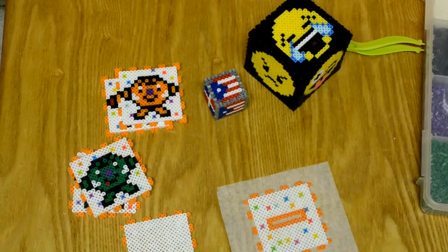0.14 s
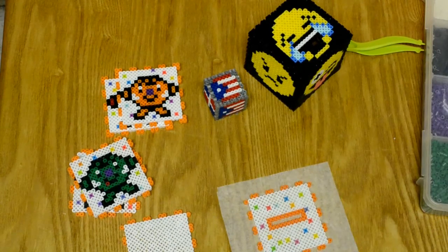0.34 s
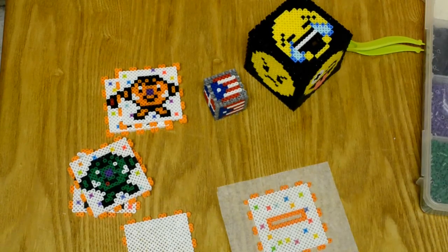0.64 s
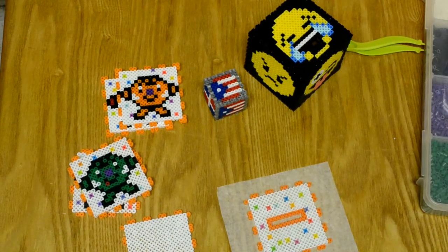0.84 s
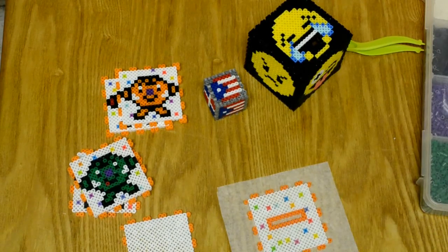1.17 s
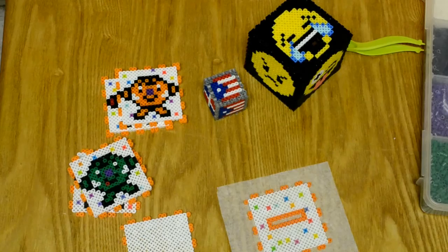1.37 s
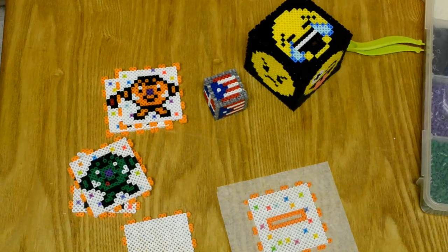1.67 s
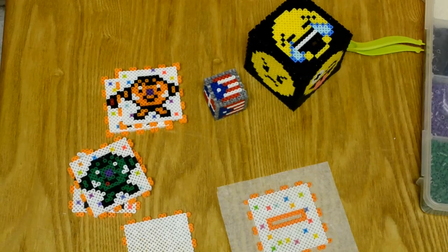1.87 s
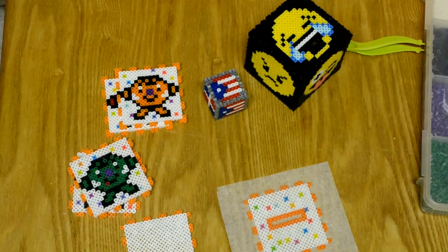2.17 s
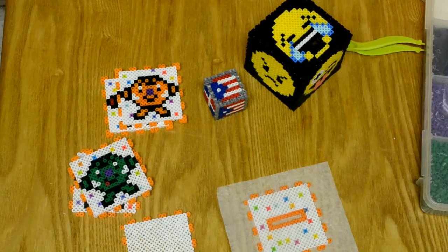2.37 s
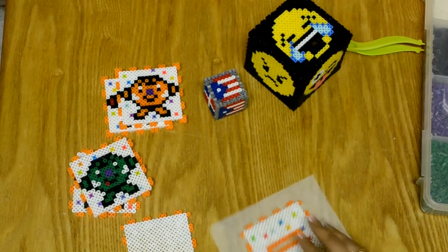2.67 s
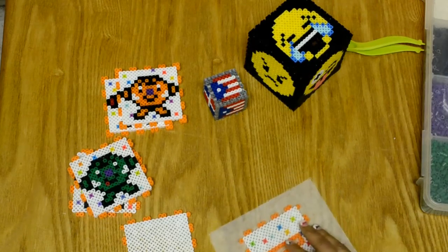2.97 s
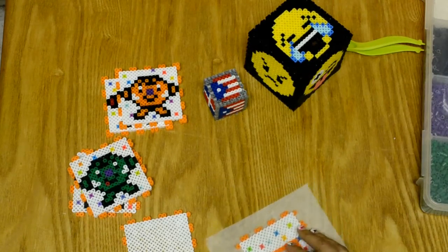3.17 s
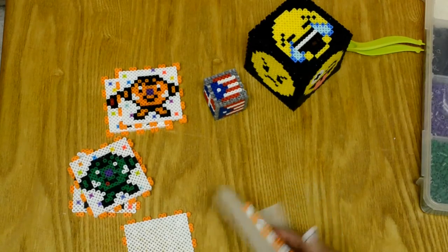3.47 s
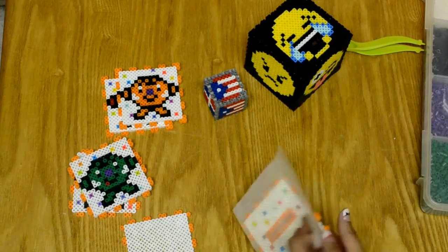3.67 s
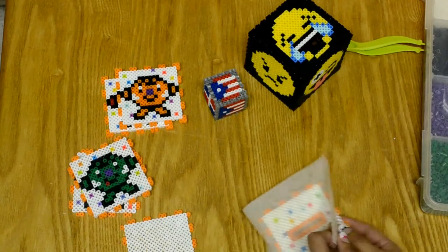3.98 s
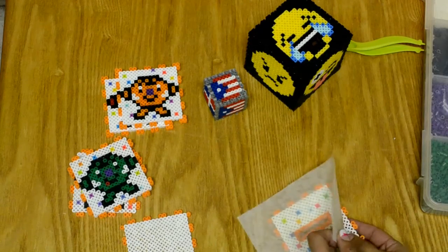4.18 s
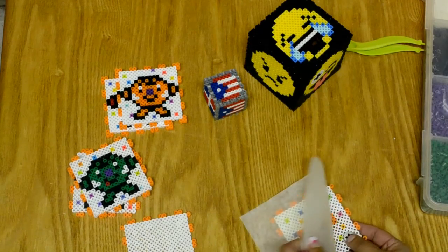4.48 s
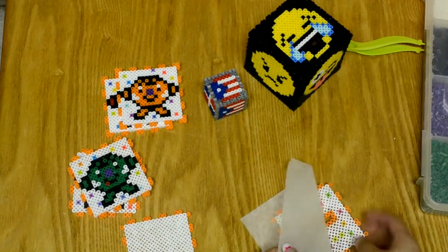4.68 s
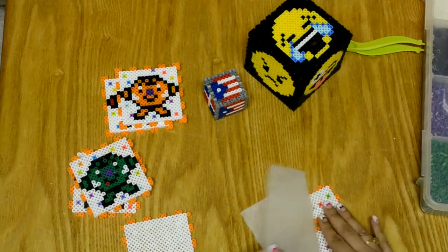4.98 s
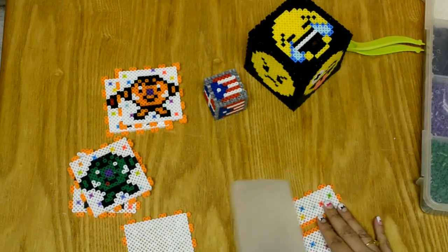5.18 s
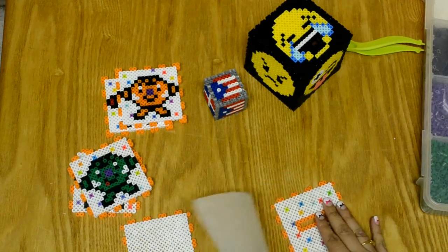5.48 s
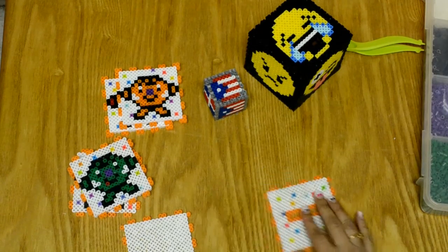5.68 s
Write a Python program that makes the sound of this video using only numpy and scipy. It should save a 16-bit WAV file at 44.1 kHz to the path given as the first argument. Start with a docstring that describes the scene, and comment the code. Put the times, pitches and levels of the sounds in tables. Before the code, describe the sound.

Baking parchment crinkles as it is handled, then crackles louder as it is peeled off a fused bead panel.

```python
"""Baking parchment at a craft table, close to one microphone in a small room with a faint hum.
First the stiff sheet is handled: it rubs in dense tiny cracks, snaps at its creases and buckles in
crunches. From 1 s things knock softly on the wooden top now and then. After a lull, at about 3.2 s,
the sheet is peeled off a warm fused bead panel, sticking and letting go in louder clumps.
Near 4.8 s the freed panel lands with a dull thud, and the last crackles follow."""
import sys
import numpy as np
from scipy import signal
from scipy.fft import rfft, irfft, next_fast_len
from scipy.io import wavfile
from scipy.ndimage import uniform_filter1d, map_coordinates

SR = 44100
rng = np.random.default_rng(int(sys.argv[2]) if len(sys.argv) > 2 else 0)


def to_wav(sig):
    """Store sig (one row per channel, or 1-D mono) as 16-bit WAV at the path in sys.argv[1].

    Samples outside -1..1 are clipped; the rate is SR.
    """
    pcm = np.clip(np.atleast_2d(sig), -1, 1) * 32767
    pcm = np.round(pcm).astype(np.int16)
    wavfile.write(sys.argv[1], SR, pcm.T)  # frames by channels


N = 257103
PEEL_START_S = 3.15


def amp(db):
    return 10 ** (np.asarray(db) / 20)


def unit_rms(x):
    return x / np.sqrt(np.mean(x ** 2) + 1e-20)


def along(points, hz):
    """Read (Hz, value) points on a log frequency axis."""
    freqs, values = np.transpose(points)
    return np.interp(np.log(hz + 1), np.log(freqs), values)


def wobble(rate):
    """A smooth random curve, rate knots a second."""
    return map_coordinates(rng.standard_normal(int(N * rate / SR) + 4), [np.arange(N) * rate / SR])


def colour(x, gain):
    """Minimum-phase filter whose magnitude is gain(Hz)."""
    size = 2 * next_fast_len(x.shape[-1] // 2 + 2048)
    cepstrum = irfft(np.log(np.maximum(gain(np.fft.rfftfreq(size, 1 / SR)), 1e-6)), size)
    cepstrum[1:size // 2] *= 2
    cepstrum[size // 2 + 1:] = 0
    return irfft(rfft(x, size) * np.exp(rfft(cepstrum)), size)[..., :x.shape[-1]]


def noise(samples, spectrum):
    """Noise of unit RMS shaped by (Hz, dB) points."""
    return unit_rms(colour(rng.standard_normal(samples), lambda hz: amp(along(spectrum, hz))))


def add(track, start_s, sound):
    part = track[max(round(start_s * SR), 0):][:len(sound)]
    part += sound[:len(part)]


# Air in the room: (frequency [Hz], relative density [dB])
AIR_SPECTRUM = [(25, -14), (60, -10), (130, -2.5), (230, 1), (400, 3.5), (800, 1.5), (1600, 0), (3000, -7),
                (6000, -16.5), (10000, -25.5), (15500, -28)]
# Tones of an appliance: (frequency [Hz], level [dB])
HUM_TONES = [(209.9, -83), (242.2, -76), (360.7, -78)]


def room_tone(air_db=-63, hum_gain_db=-1, drift_rad=0.59):
    """All around the microphone: soft air and the slightly unsteady hum of an appliance."""
    t = np.arange(N) / SR
    air = noise(N, AIR_SPECTRUM)
    hum = sum(amp(db) * np.sqrt(2) * np.sin(2 * np.pi * hz * t + drift_rad * wobble(6.7))
              for hz, db in HUM_TONES)
    return amp(air_db) * air + amp(hum_gain_db) * hum


# Hands slide or pull the sheet:
# (start [s], length [s], body level [dB], flap re body [dB], crispness re body [dB])
HAND_STROKES = [(0, 0.084, -53.5, -11, -1), (0.147, .13, -64, -3, -16), (0.292, 0.19, -44, -8.5, -1.5),
                (0.544, 0.069, -47, -6.5, -1.5), (.66, 0.1, -50.5, -9.5, -5.5),
                (0.773, 0.16, -44.5, -12.5, -5.5), (0.987, 0.09, -51, -6, -2.5),
                (1.111, 0.12, -47.5, -9, 0), (1.264, 0.21, -56.5, -10, -5), (1.561, 0.23, -51.5, -7.5, -3),
                (1.81, 0.12, -62.5, -16, -1), (2.455, 0.39, -69.5, -16, 2.5),
                (3.195, 0.066, -50.5, -7.5, -4.5), (3.355, 0.14, -49, -9, 1.5),
                (3.477, 0.051, -39.5, -7.5, -0.5), (3.6, 0.16, -46.5, -10, -6.5),
                (3.815, 0.093, -35, -16, -5.5), (3.962, 0.036, -40.5, -8, -2),
                (4.057, 0.051, -41, -15, -5.5), (4.132, 0.049, -37.5, -15.5, -6),
                (4.274, 0.018, -56.5, -16, 4), (4.39, .05, -54, -19, 2), (4.444, .13, -45.5, -12, -0.5),
                (4.595, 0.059, -46.5, -16, -6), (4.735, .02, -53.5, -19, 2.5),
                (4.839, 0.035, -51.5, -14, -7), (4.99, 0.16, -48.5, -15.5, 0.5), (5.219, 0.2, -50, -14, 1),
                (5.361, 0.07, -42.5, -16, -5), (5.549, 0.025, -54, -10, -1), (5.751, 0.042, -49.5, -22, -2)]


def hand_effort(attack_s=0.016, release_db_per_s=157):
    """Strength of flap, body and crispness: each stroke swells, holds while the hand moves and fades."""
    t, power = np.arange(N) / SR, np.zeros((3, N))
    for start, length, db, flap_db, crisp_db in HAND_STROKES:
        swell = 1 - np.exp(-np.maximum(t - start, 0) / attack_s)
        release = amp(-np.minimum(release_db_per_s * np.maximum(t - start - length, 0), 200))
        power += np.outer(amp([db + flap_db, db, db + crisp_db]), swell * release) ** 2
    return np.sqrt(power)


def cracks(per_s, spread_db, rub):
    """Tiny cracks of very unequal size over the hiss of rubbing."""
    size = amp(spread_db * np.clip(rng.standard_normal(N), -3, 2.5))
    ticks = (rng.random(N) < per_s / SR) * size * rng.choice([-1, 1], N)
    return unit_rms(ticks) + rub * rng.standard_normal(N)


# Parchment at close range: (frequency [Hz], relative density [dB])
PAPER_SPECTRUM = [(100, -49), (300, -22.5), (500, -14.5), (800, -9.5), (1200, -6), (1700, -1.5),
                  (2100, -1.5), (3000, -1.5), (5000, -5.5), (7000, -10), (10000, -14.5), (15500, -23)]


def sheet(drive, low_hz=1000, high_hz=3500):
    """The paper radiates as a whole (flap), from its facets (body) and from sharp creases (crisp)."""
    below = lambda hz, edge: 1 / np.sqrt(1 + (hz / edge) ** 8)
    above = lambda hz, edge: np.sqrt(1 - below(hz, edge) ** 2)
    flap = lambda hz: below(hz, low_hz)
    body = lambda hz: above(hz, low_hz) * below(hz, high_hz)
    crisp = lambda hz: above(hz, high_hz)
    return [unit_rms(colour(drive, lambda hz: amp(along(PAPER_SPECTRUM, hz)) * band(hz)))
            for band in (flap, body, crisp)]


def rustle(effort):
    """The sheet slides smoothly at first; as it is peeled it sticks and lets go in clumps."""
    sliding = unit_rms(cracks(per_s=3000, spread_db=3.5, rub=0.58) * amp(0.8 * wobble(45.07)))
    peeling = unit_rms(cracks(per_s=1700, spread_db=4.5, rub=0.47) * amp(1.64 * wobble(90)))
    drive = np.where(np.arange(N) / SR < PEEL_START_S, sliding, peeling)
    return np.sum(effort * sheet(drive), axis=0)


# Single creases flip: (time [s], facet pitch [Hz], facet level [dB], edge level [dB])
CREASE_FLIPS = [(.0771, 2680, -37.5, -36), (.4122, 2400, -31.5, -30), (.5494, 2310, -30, -31.5),
                (.5882, 2230, -33, -30), (.768, 3300, -28.5, -39), (.9305, 1790, -30, -48),
                (.942, 1720, -35, -33.5), (2.3665, 8000, -56, -60), (2.4514, 1840, -53, -55),
                (2.4614, 4770, -47.5, -42), (2.8606, 5500, -42, -46), (3, 2680, -50, -50.5),
                (3.0298, 5600, -45.5, -55), (3.0695, 4220, -49, -48), (3.1082, 2600, -47, -52),
                (3.1867, 4240, -66, -41.5), (3.213, 3000, -42, -35), (3.2404, 2320, -37, -37),
                (3.3256, 1780, -26.5, -41), (3.3616, 1880, -32.5, -40), (3.3792, 1730, -23, -28),
                (3.4152, 1760, -23, -36), (3.463, 1540, -31.5, -32), (3.5289, 1640, -25, -24.5),
                (3.5442, 2780, -23, -25.5), (3.695, 2810, -34, -38), (3.7266, 1900, -32, -43),
                (3.7623, 1330, -30.5, -53), (3.8226, 1670, -33, -39), (3.9205, 1700, -20.5, -32),
                (4.136, 1710, -17.5, -26.5), (4.1524, 1700, -22, -33), (4.285, 1600, -47, -39.5),
                (4.371, 1520, -35.5, -48), (4.5264, 3160, -42, -30), (4.7008, 2450, -26.5, -34),
                (4.9727, 1310, -37, -37.5), (5.0039, 2170, -39, -38.5), (5.247, 2980, -49, -40),
                (5.294, 2980, -48, -37.5), (5.3712, 4400, -40, -36), (5.3958, 4100, -27, -48),
                (5.7533, 3020, -36, -52)]
# The crack of a crease's sharp edge: (frequency [Hz], relative density [dB])
EDGE_SPECTRUM = [(60, -60), (300, -40), (1500, -11.5), (4500, 4.5), (7000, -2), (10000, -6), (15500, -10)]


def snaps(extra_flips, rattle=0.45, rattle_cycles=45, fray=0.4, fray_t60=0.011):
    """A crease flips with one sharp step and a short fraying; its facet rattles on at its own pitch."""
    out, t = np.zeros(N), np.arange(SR // 12) / SR
    same_energy = lambda x: x / np.sqrt(np.sum(x ** 2) / (SR / 1000))  # that of 1 ms at unit RMS
    flip = lambda share, t60: (t == 0) + share * rng.standard_normal(len(t)) * amp(-60 * t / t60)
    for start, hz, facet_db, edge_db in CREASE_FLIPS + extra_flips:
        damping = 0.14 * (1 + (hz / 3400) ** 4)  # small, high facets tick rather than ring
        detuning = lambda f: f / hz - hz / (f + 1)
        resonance = lambda f: 1 / np.hypot(1, detuning(f) / damping) / (1 + (700 / (f + 1)) ** 3)
        facet = same_energy(colour(flip(rattle, rattle_cycles / hz), resonance))
        edge = same_energy(colour(flip(fray, fray_t60), lambda f: amp(along(EDGE_SPECTRUM, f))))
        add(out, start, amp(facet_db) * facet + amp(edge_db) * edge)
    return out


# The sheet buckles: (time [s], body level [dB], crispness re body [dB])
BUCKLES = [(.3022, -38, -0.5), (.3974, -46, 1.5), (0.413, -39.5, -3), (0.5514, -44, 5), (0.657, -45, 2.5),
           (.747, -46.5, 1), (.766, -37, -0.5), (0.929, -37.5, -8), (1.115, -39, -4.5), (1.1525, -45.5, 3),
           (1.3174, -53, -0.5), (1.4196, -58, -1), (1.5454, -53, -8), (1.609, -46.5, -4.5),
           (1.6694, -54, -3), (1.7444, -59, -4), (1.852, -51.5, -12), (1.9131, -71, 3), (1.9714, -57, -3),
           (3.2325, -49.5, -6), (3.319, -39, -12), (3.413, -41.5, -23), (3.526, -39, 0), (3.917, -33, -3.5),
           (4.148, -30, -2), (4.368, -47, -3.5), (4.5144, -43.5, -2), (4.8194, -48.5, 6), (4.834, -40, -10),
           (4.971, -47.5, -2), (5.069, -41.5, -2.5), (5.495, -48, -15), (5.755, -47, -8)]


def crunches(flap_db=-14, rise_s=0.0076, fall_s=0.019):
    """Each buckle sets off a quick run of cracks that dies away."""
    flap, body, crisp = sheet(cracks(per_s=3900, spread_db=3.5, rub=0.95))
    out, t = np.zeros(N), np.arange(SR // 4) / SR
    swell = (1 - np.exp(-t / rise_s)) * np.exp(-t / fall_s)
    for start, db, crisp_db in BUCKLES:
        span = np.minimum(round(start * SR) + np.arange(len(t)), N - 1)
        crackle = body[span] + amp(flap_db) * flap[span] + amp(crisp_db) * crisp[span]
        add(out, start, amp(db) * swell / swell.max() * crackle)
    return out


# The hollow of the curled sheet: (time [s], pitch [Hz], ring re plain sheet [dB])
CUP_SHAPES = [(.95, 1800, -16), (1.15, 1900, 8.5), (1.35, 1750, -7), (3.34, 1920, -10), (3.43, 1400, -18),
              (3.5, 1110, 11), (3.55, 950, 4.5), (3.68, 1200, -21), (3.79, 1180, 12), (3.86, 1640, -6),
              (4.1, 1560, 8), (4.5, 1690, -11), (4.85, 1260, 8), (5.3, 1500, -14)]


def curled(x, cup_damping=0.22, facets_db=2):
    """The sheet curls into a cup that rings lower the wider it opens; shifting facets vary its colour."""
    hz, t, spectra = signal.stft(x, SR, nperseg=256)
    times, pitches, ring_db = np.transpose(CUP_SHAPES)
    ratio = (hz[:, None] + 1) / np.interp(t, times, pitches)
    cup = 1 + amp(np.interp(t, times, ring_db)) / (1 + 1j * (ratio - 1 / ratio) / cup_damping)
    facets = uniform_filter1d(rng.standard_normal(spectra.shape), size=3, axis=0)
    facets = unit_rms(uniform_filter1d(facets, size=12, axis=1))
    return signal.istft(spectra * cup * amp(facets_db * facets), SR, nperseg=256)[1][:N]


# Soft knocks on the table: (time [s], level [dB])
TABLE_KNOCKS = [(1.059, -31.5), (2.328, -34), (2.366, -39.5), (3.631, -39), (4.837, -37), (4.95, -39),
                (5.257, -42)]
# Modes of the wooden top: (frequency [Hz], relative level [dB], t60 [s])
WOOD_MODES = [(235, -29, 0.073), (498, 2, 0.089), (620, -11, 0.027), (696, -3, 0.069), (756, -3, 0.063),
              (877, -3, 0.039), (1180, -16, .05)]
# Loose things on the top: (frequency [Hz], relative density [dB])
CLATTER_SPECTRUM = [(100, -29), (350, -13), (750, 8), (1200, -3.5), (2500, -10.5), (5000, -31),
                    (12000, -40)]


def knocks(ring_db=-11, clatter_db=-9, clatter_t60=0.13, attack_s=0.0024):
    """Soft contacts ring the wooden top at new strengths each time and shake what lies on it."""
    out, t = np.zeros(N), np.arange(SR // 4) / SR
    onset = 1 - np.exp(-t / attack_s)
    for start, db in TABLE_KNOCKS:
        ring = sum(amp(mode_db + rng.normal(0, 1.0) - 60 * t / t60)
                   * np.sin(2 * np.pi * (hz * t + rng.random())) for hz, mode_db, t60 in WOOD_MODES)
        clatter = amp(clatter_db - 60 * t / clatter_t60) * noise(len(t), CLATTER_SPECTRUM)
        add(out, start, amp(db) * (amp(ring_db) * ring + clatter) * onset)
    return out


def small_creases(effort, count=50, pitch_hz=2600, pitch_spread=0.33, facet_db=2, edge_db=3, scatter_db=2):
    """Once peeling starts, creases flip at random, as hard as the pull; rows like CREASE_FLIPS."""
    first = PEEL_START_S * SR
    at = (first + rng.random(count) * (N - 1 - first)).astype(int)
    pitch_draw, facet_draw, edge_draw = np.clip(rng.standard_normal((count, 3)), -2, 2).T
    _, body_db, crisp_db = 20 * np.log10(effort[:, at] + 1e-9)
    pitches = pitch_hz * np.exp(pitch_spread * pitch_draw)
    facet_levels = body_db + facet_db + scatter_db * facet_draw
    edge_levels = crisp_db + edge_db + scatter_db * edge_draw
    return list(zip(at / SR, pitches, facet_levels, edge_levels))


def panel_lands(start_s=4.835, level_db=-56, t60=0.18, attack_s=0.003):
    """The freed panel lands flat and the table top gives a low, dull thud."""
    out, t = np.zeros(N), np.arange(SR // 3) / SR
    # (frequency [Hz], relative density [dB])
    thud_spectrum = [(60, -20), (140, -3), (250, -9), (380, 4.5), (700, -17), (2000, -34)]
    fade = amp(-60 * t / t60) * (1 - np.exp(-t / attack_s))
    add(out, start_s, amp(level_db) * fade * noise(len(t), thud_spectrum))
    return out


# Decay of the small room: (frequency [Hz], t60 [s])
ROOM_DECAY = [(200, 0.37), (800, 0.24), (2000, 0.33), (5500, 0.27), (14000, 0.13)]


def room(x, wet_db, build_s=0.0012):
    """Nearby walls answer within milliseconds; the high treble dies first."""
    hz, t, spectra = signal.stft(rng.standard_normal(SR // 2), SR, nperseg=256)
    decay = amp(-60 * t / along(ROOM_DECAY, hz)[:, None])
    tail = signal.istft(spectra * decay, SR, nperseg=256)[1]
    tail *= 1 - np.exp(-np.arange(len(tail)) / SR / build_s)
    return x + amp(wet_db) * signal.fftconvolve(x, tail / np.linalg.norm(tail))[:N]


def scene():
    """Close to the table, paper and wood are louder than the walls' answer; room tone lies beneath."""
    effort = hand_effort()
    paper = room(curled(rustle(effort) + crunches()), wet_db=-10.5)
    creases = room(snaps(small_creases(effort)), wet_db=-4)
    table = room(knocks() + panel_lands(), wet_db=-5.5)
    return (paper + creases + table + room_tone())[None]


# Notches of the microphone housing: (centre [Hz], width [Hz], gain [dB])
HOUSING_NOTCHES = [(7870, 174, -5.5), (12030, 1050, -18)]


def record(dry, top_hz=16000):
    """One microphone: its housing cuts two notches in the treble; nothing passes above the band limit."""
    notches_db = lambda hz: sum(db * np.exp(-.5 * ((hz - centre) / width) ** 2)
                                for centre, width, db in HOUSING_NOTCHES)
    heard = colour(dry, lambda hz: amp(notches_db(hz)))
    size = next_fast_len(N + SR // 4)
    passband = np.fft.rfftfreq(size, 1 / SR) < top_hz
    return irfft(rfft(heard, size) * passband, size)[..., :N]


dry = scene()
out = record(dry)
to_wav(out)
```